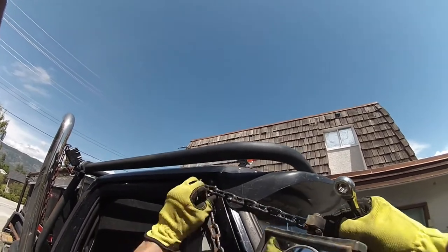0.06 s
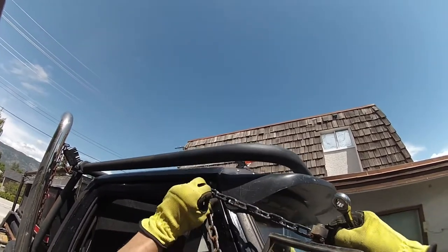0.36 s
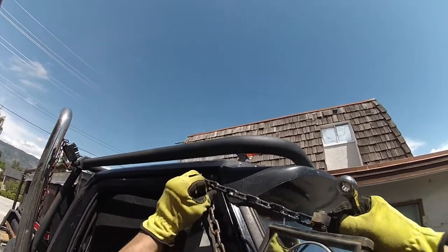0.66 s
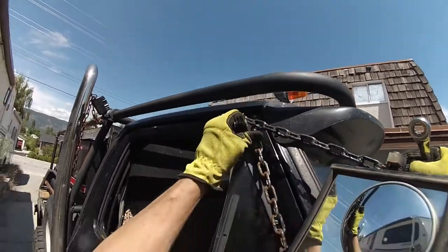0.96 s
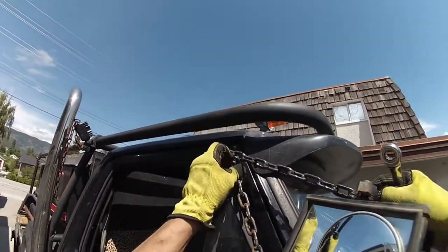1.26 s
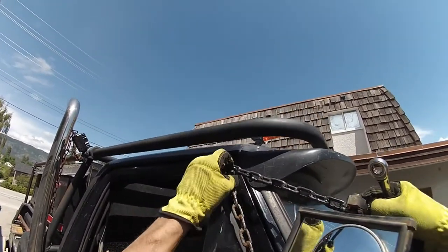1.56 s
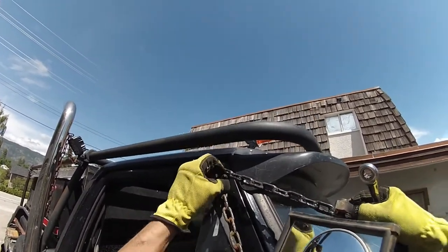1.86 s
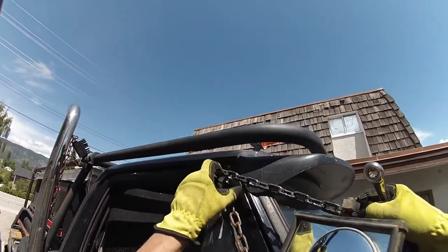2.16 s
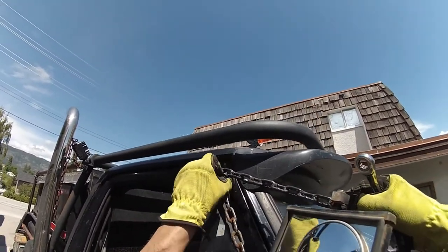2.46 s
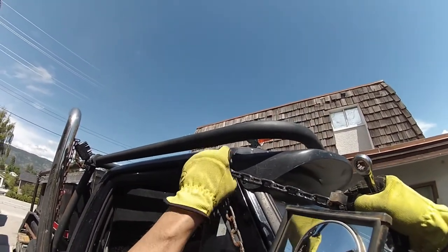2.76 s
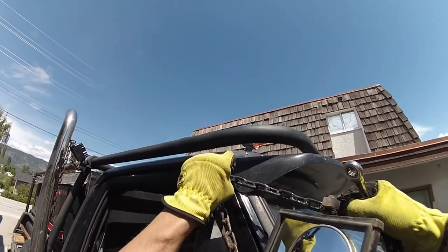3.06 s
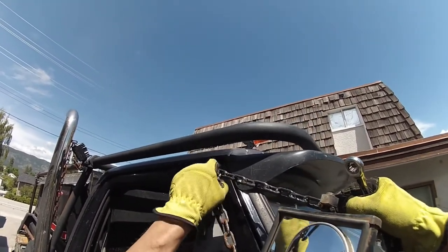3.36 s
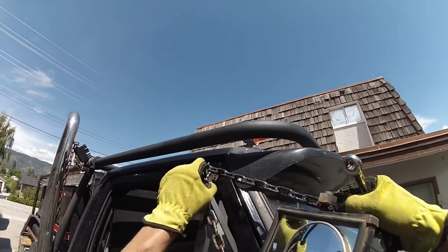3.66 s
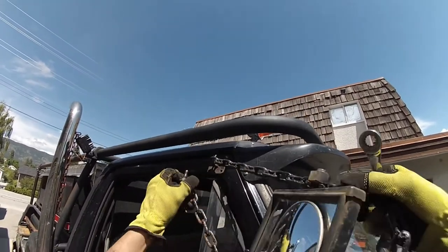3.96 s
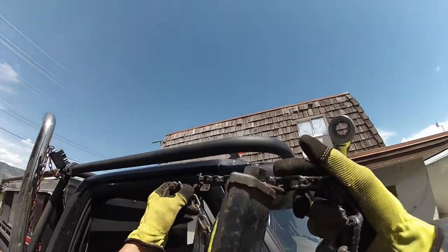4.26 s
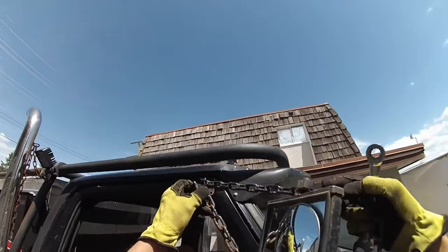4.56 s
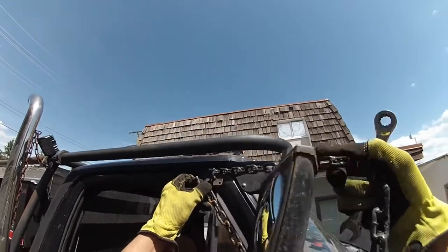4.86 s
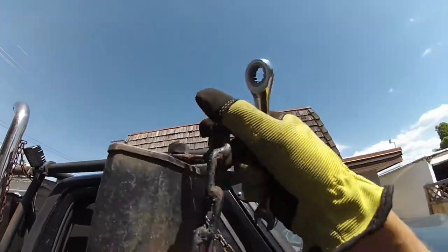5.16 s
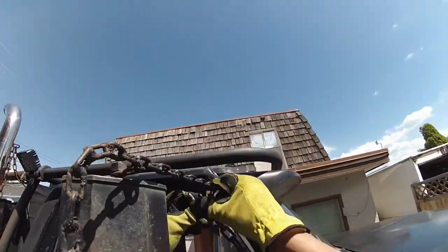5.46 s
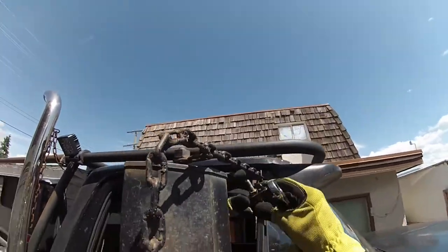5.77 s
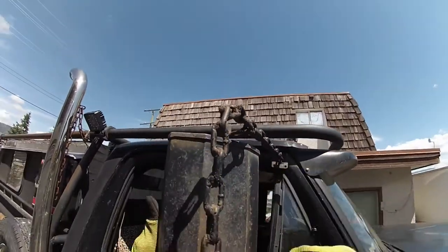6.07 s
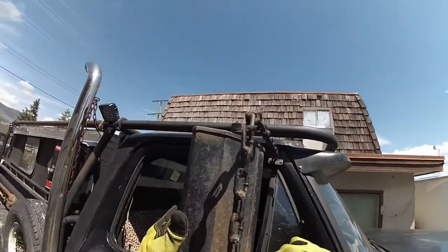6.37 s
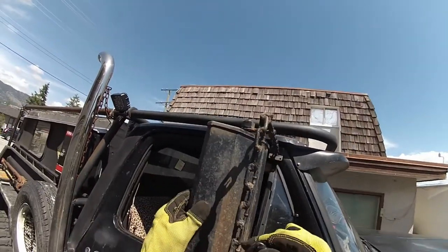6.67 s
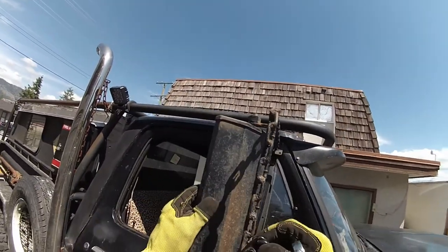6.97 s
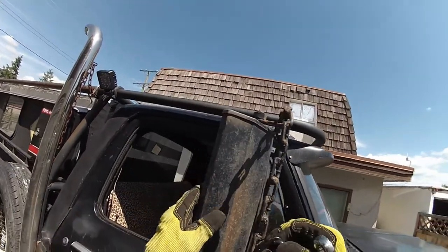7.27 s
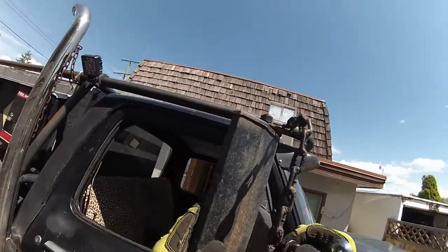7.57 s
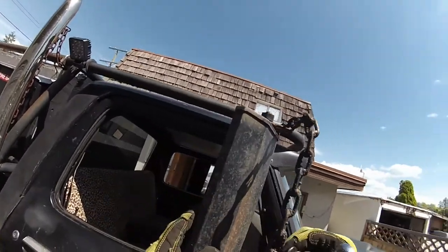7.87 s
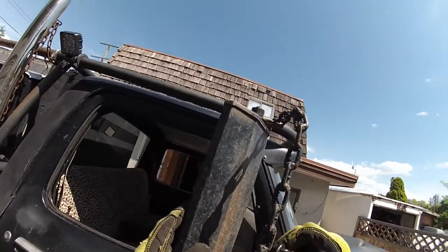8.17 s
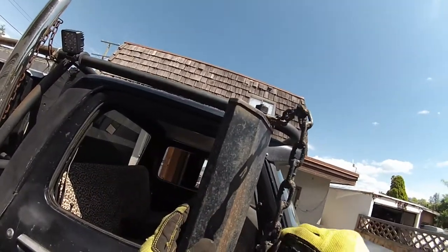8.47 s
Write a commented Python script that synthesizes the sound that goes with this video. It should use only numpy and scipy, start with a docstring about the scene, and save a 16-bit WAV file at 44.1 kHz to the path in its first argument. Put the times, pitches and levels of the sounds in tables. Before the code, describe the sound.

Outdoors, close to a body-worn microphone, chain links clink and scrape in short, irregular bursts while a steel bracket bumps a truck cab. A few heavier knocks and one loud clank lead to a quieter stretch, then the rattling briefly returns. Sharp microphone ticks crackle throughout, along with soft glove rubbing. Low rumble, distant traffic and a faint engine lie underneath.

```python
"""A heavy steel mirror bracket is lowered on a chain beside a truck door, close by.
Links clink, bite and slide; the bracket knocks against the cab, which booms. Each contact is a
chattering force that rings the same modes. Gloves rub on the steel. Sharp ticks crackle on the
sample-block edges of a body-worn camera. Underneath: low rumble, far traffic, a distant engine,
open air and a faint hum."""
import sys
import numpy as np
from scipy import signal
from scipy.fft import rfft, irfft, next_fast_len
from scipy.io import wavfile
from scipy.ndimage import uniform_filter1d, map_coordinates

SR = 44100
rng = np.random.default_rng(int(sys.argv[2]) if len(sys.argv) > 2 else 0)


def master(y):
    """Save y as 16-bit WAV."""
    cut = np.clip(np.atleast_2d(y).T, -1, 1)
    pcm = np.round(cut * 32767)  # scale
    wavfile.write(sys.argv[1], SR, pcm.astype(np.int16))


N = 379701

# Noise spectra: f/Hz, relative density/dB
RUMBLE_SPECTRUM = [(10, -12), (25, 1), (52, 1.5), (75, -3), (120, -11), (300, -75.5)]
TRAFFIC_SPECTRUM = [(35, -33.5), (62, 2), (85, -4.5), (120, -6.5), (300, -33), (800, -84)]
AIR_SPECTRUM = [(100, -1.5), (300, 3), (900, 1), (1600, -9), (6000, -24.5), (15000, -32.5)]
HISS_SPECTRUM = [(100, -5.5), (700, 4), (2300, 0), (8000, -1.5), (15000, -9)]
GLOVE_SPECTRUM = [(70, -14.5), (140, 0), (220, -3.5), (450, -9), (900, -14.5), (4000, -48.5), (15000, -81)]
# Dense modes of steel and cab: f/Hz, relative density/dB
STEEL_SPECTRUM = [(60, -24), (130, 6.5), (220, -2), (1200, -3), (2000, -5.5), (3000, -12), (4300, -9.5),
                  (6000, -5.5), (8000, -7), (15000, -10)]
CAB_SPECTRUM = [(70, -9), (165, -2.5), (230, -9.5), (500, -3.5), (1100, -19.5), (9000, -76)]
# Rumble envelope: t/s, level/dB
RUMBLE_LEVELS = [(0.0, -53), (3.04, -43.5), (3.62, -52), (4.41, -43), (4.56, -48), (5.61, -43.5),
                 (5.95, -50), (8.61, -50)]
# Engine run: t/s, firing f/Hz, level/dB
ENGINE_RUN = [(0, 63.2, -50.5), (2.0, 63.84, -61), (4.3, 66.3, -57.5), (5.3, 92.2, -55), (5.9, 70.6, -54),
              (6.4, 67.4, -50), (7.2, 69.04, -49), (7.9, 74.5, -54), (8.4, 81.9, -50)]
# Hum partials: f/Hz, level/dB
HUM_PARTIALS = [(148.5, -69.5), (297, -65)]
# Loud single ticks: t/s, peak level/dB
LOUD_TICKS = [(0.3671, -22.5), (0.9436, -27.5), (1.029, -24.5), (1.6056, -23.5), (1.9481, -24),
              (2.3307, -31), (2.4587, -29.5), (2.5654, -27), (2.801, -26.5), (3.3546, -27.5), (3.9308, -21),
              (4.0371, -27.5), (4.742, -23.5), (5.1254, -15.5), (5.1472, -13.5), (5.4878, -18.5),
              (5.5942, -21.5), (7.8772, -27.5), (8.4963, -22)]
# Glove strokes: centre t/s, length/s, level/dB
GLOVE_STROKES = [(0.895, 0.63, -57), (1.58, 0.7, -53), (2.01, 0.23, -60), (2.75, 0.93, -53),
                 (3.205, 0.67, -52.5), (4.193, 0.43, -58), (4.76, 0.63, -48), (5.602, 0.42, -51.5),
                 (8.248, 0.65, -47.5)]
# Modes of cab with bracket, and of the links: f/Hz, relative level/dB, t60/s
BODY_MODES = [(182.2, -11.5, 0.43), (218.3, 4, 0.3), (238.2, 3.5, 0.28), (324, -0.5, 0.11),
              (412, -1.5, 0.17), (616.3, 6.5, 0.12), (770, -2, 0.15), (900, -8.5, 0.26), (1077, -5.5, .14),
              (1270, -5.5, 0.18), (1590, -2.5, 0.18), (1880, -9.5, 0.34)]
LINK_MODES = [(2320, -8, .07), (3040, -2, 0.15), (3545, 3, 0.022), (4960, -6, 0.037), (5600, -0.5, 0.072),
              (6560, -8.5, 0.043), (7580, 8, 0.037), (8470, 8, 0.061)]
# Thud, knock, clank and clink bands: lower edge f/Hz
BAND_EDGES_HZ = [130, 400, 1300, 4000]
# The same bands at zero tilt: level/dB re knock
BAND_BALANCE_DB = [-1.17, 0, -10, -24.5]
# Metal contacts: t/s, knock level/dB, tilt/(dB/octave), chatter time/s
METAL_CONTACTS = [(0.102, -53, -4, 0.016), (0.275, -51, -3, 0.0095), (0.347, -39.5, 2, 0.0034),
                  (0.543, -42.5, 0, .005), (0.615, -61.5, 12, 0.0041), (0.6917, -33.5, 8.5, 0.0025),
                  (0.816, -47.5, 4, .007), (0.923, -40, -1.6, 0.0044), (1.172, -37.5, 1.6, 0.016),
                  (1.369, -33, 5, 0.016), (1.499, -48, -2.5, 0.023), (1.6, -60.5, 6, 0.034),
                  (1.747, -42, 0.2, 0.013), (1.904, -46, -0.5, .017), (1.935, -38, -3.5, 0.011),
                  (2.011, -52.5, -6.5, 0.026), (2.055, -43, -0.1, 0.0096), (2.106, -45.5, -1.3, .015),
                  (2.209, -45.5, 0.7, .018), (2.601, -53, 0.5, .008), (2.646, -48, -1.5, 0.0097),
                  (2.719, -46.5, -1, .006), (2.843, -38, -1, 0.0064), (2.928, -42.5, 0.5, 0.0019),
                  (3.025, -48, -4, 0.017), (3.109, -46.5, -4.5, 0.011), (3.203, -50.5, -5.5, 0.023),
                  (3.244, -41, -0.5, .005), (3.278, -43, -3, 0.013), (3.328, -49.5, 2, .023),
                  (3.48, -41, 2, .0065), (3.669, -36.5, 1.7, .011), (3.711, -42, -5.5, 0.0017),
                  (4.262, -27.5, -0.35, 0.00079), (4.587, -42.5, -3, 0.0031), (4.727, -32, -4.5, 0.0027),
                  (5.049, -47, -6, 0.00085), (5.431, -39, -3.5, .029), (5.456, -25, 1.5, 0.012),
                  (5.505, -39.5, -1.5, 0.013), (5.595, -54.5, 9.5, 0.0061), (5.597, -41.5, -0.1, 0.01),
                  (6.244, -52, 1.2, .026), (6.65, -55, 4, 0.0041), (6.969, -47, 5, 0.0069),
                  (7.02, -54.5, 3.5, .013), (7.223, -50.5, 4.5, .002), (7.359, -56, 1.5, 0.034),
                  (7.51, -47, 0.2, 0.011), (7.752, -50, 4.5, 0.0035), (7.886, -45.5, -1.5, .017),
                  (8.059, -47.5, -.6, 0.024), (8.173, -46.5, 2.1, 0.0054), (8.201, -37.5, -0.3, 0.014),
                  (8.26, -34, -0.3, 0.015), (8.397, -43, -2, 0.0087)]


def amp(db):
    """Decibels to gain."""
    return 10 ** (np.asarray(db) / 20)


def unit(x):
    """Scale to rms 1."""
    return x / np.sqrt(np.mean(x ** 2) + 1e-20)


def shape(points, hz):
    """Gain from (f/Hz, level/dB) points on a log axis."""
    f, db = np.transpose(points)
    return amp(np.interp(np.log(hz + 1), np.log(f + 1), db))


def curves(rows):
    """Per-sample curve for each column after t/s."""
    times_s, *columns = np.transpose(rows)
    return [np.interp(np.arange(N) / SR, times_s, column) for column in columns]


def wobble(rate_hz):
    """Smooth random curve with knots at rate_hz."""
    knots = rng.standard_normal(int(N * rate_hz / SR) + 4)
    return map_coordinates(knots, [np.arange(N) * rate_hz / SR])


def filtered(x, response):
    """Zero-phase filter with gain response(hz)."""
    n = x.shape[-1]
    padded = next_fast_len(n + SR // 20)
    return irfft(rfft(x, padded) * response(np.fft.rfftfreq(padded, 1 / SR)), padded)[..., :n]


def noise(spectrum, size=N):
    """Shaped noise, rms 1."""
    return unit(filtered(rng.standard_normal(size), lambda hz: shape(spectrum, hz)))


def add(track, at_s, sound):
    """Mix a sound into the track."""
    start = max(round(at_s * SR), 0)
    part = track[start:start + len(sound)]
    part += sound[:len(part)]


def background():
    """Low rumble, drone of far traffic, open air."""
    rumble_db, = curves(RUMBLE_LEVELS)
    rumble = amp(rumble_db + 3.4 * wobble(8.2)) * noise(RUMBLE_SPECTRUM)
    return rumble + amp(-55) * noise(TRAFFIC_SPECTRUM) + amp(-61.5) * noise(AIR_SPECTRUM)


def engine(second_order_db=-13):
    """Distant engine: only the two lowest orders carry this far."""
    firing_hz, db = curves(ENGINE_RUN)
    phase = 2 * np.pi * np.cumsum(firing_hz * (1 + 0.011 * wobble(6.3))) / SR
    return amp(db + 0.64 * wobble(5)) * unit(np.sin(phase) + amp(second_order_db) * np.sin(2 * phase))


def hum(start_s=5.16, rise_s=2.14, waver=0.0037):
    """Faint, slightly unsteady hum, fading in."""
    rise = np.clip((np.arange(N) / SR - start_s) / rise_s, 0, 1)
    clock_s = np.cumsum(1 + waver * wobble(3.7)) / SR
    return rise * sum(amp(db) * unit(np.sin(2 * np.pi * hz * clock_s)) for hz, db in HUM_PARTIALS)


def tick(typical_ms, sag):
    """Signal jump that sags, then snaps back."""
    t_ms = 1000 * np.arange(SR // 1000) / SR
    width_ms = typical_ms * np.exp(0.53 * rng.standard_normal())
    polarity = np.sign(rng.standard_normal())
    return polarity * np.exp(-sag * t_ms / width_ms) * (t_ms < width_ms)


def crackle(handling, faint_db=-44, ceiling_db=-27, bunch_db=3, average_s=0.59, follow_db_per_db=0.27):
    """Uneven block-edge ticks that bunch and grow with the handling noise, plus loud single ticks."""
    track = np.zeros(N)
    block_s = 1024 / 48000
    edges_s = np.arange(0.00542, N / SR, block_s)
    edges = (edges_s * SR).astype(int)
    handling_rms = np.sqrt(np.abs(uniform_filter1d(handling ** 2, int(average_s * SR))))[edges]
    growth = (handling_rms / np.median(handling_rms)) ** follow_db_per_db
    typical = amp(faint_db + bunch_db * wobble(22)[edges]) * growth
    peaks = np.minimum(typical * rng.rayleigh(size=len(edges)) ** 1.39, amp(ceiling_db))
    for at_s, peak in zip(edges_s, peaks):
        add(track, at_s, peak * tick(typical_ms=0.16, sag=0.66))
    for at_s, db in LOUD_TICKS:
        add(track, at_s, amp(db) * tick(typical_ms=0.17, sag=1))
    return track


def gloves(grip_db=-59):
    """Gloves rub on steel: strokes swell and fade over the faint shifting of the grip."""
    t = np.arange(N) / SR
    power = amp(grip_db) ** 2
    for centre_s, length_s, db in GLOVE_STROKES:
        arch = np.cos(np.pi * np.clip((t - centre_s) / length_s, -0.5, 0.5))
        power += (amp(db) * arch) ** 2
    return np.sqrt(power) * amp(2 * wobble(14)) * noise(GLOVE_SPECTRUM)


def chatter(t, span_s, scrape=1.7, touch=0.68, skips=9):
    """Unit-energy force: rusty links touch, grind and skip before they seat."""
    skip_s = 1.4 * span_s * rng.random(skips)
    skip_sizes = 0.48 * rng.standard_normal(skips)
    progress = t / span_s
    force = rng.standard_normal(len(t)) * progress * np.exp(-2 * progress)
    force *= scrape / np.linalg.norm(force)
    force[0] += touch
    skip_samples = np.minimum(skip_s * SR, len(t) - 1).astype(int)
    force += np.bincount(skip_samples, skip_sizes, len(t))
    return force / np.linalg.norm(force)


def ring(modes, t, spread_db, detune=0):
    """Damped modes: strength varies with contact point, tuning from link to link."""
    hz, db, t60_s = np.transpose(modes)[:, :, None]
    strength, phase, tuning = rng.standard_normal((3, len(modes), 1))
    envelopes = amp(db + spread_db * strength - 60 * t / t60_s)
    cycles = hz * (1 + detune * tuning) * t + phase
    return np.sum(envelopes * np.sin(2 * np.pi * cycles), axis=0)


def ripple(hz, depth_db=3.8, count=150):
    """Random gain: a contact point favours some steel resonances and misses others."""
    centres_hz = np.geomspace(100, SR / 2, count)
    return amp(depth_db * np.interp(hz, centres_hz, rng.standard_normal(count)))


def struck(force, t):
    """Crack, ring of steel and cab, and a faint answer from a house wall."""
    def decay(db, t60_s):
        return amp(db - 60 * t / t60_s)

    def swell(envelope):
        """Dense modes gather the contact's energy and lose it again."""
        energy = signal.fftconvolve(force ** 2, envelope ** 2)[:len(t)]
        return np.sqrt(np.abs(energy))

    clatter = unit(filtered(noise(STEEL_SPECTRUM, len(t)), ripple))
    crack = decay(11.5, t60_s=0.013)
    steel = clatter * swell(crack + decay(0, t60_s=0.14))
    wall = noise(STEEL_SPECTRUM, len(t)) * swell(decay(-11.5, t60_s=0.24))
    cab = noise(CAB_SPECTRUM, len(t)) * swell(decay(-7.5, t60_s=0.25))
    body = amp(-14) * ring(BODY_MODES, t, spread_db=5.5)
    links = amp(-15) * ring(LINK_MODES, t, spread_db=3.5, detune=0.029)
    return steel + wall + cab + signal.fftconvolve(force, body + links)[:len(t)]


def band_gains(hz, cutoff_hz):
    """Thud, knock, clank and clink responses under a common low-pass."""
    lowpasses = [1 / (1 + (hz / edge_hz) ** 8) for edge_hz in BAND_EDGES_HZ]
    bands = np.diff(lowpasses + [np.ones_like(hz)], axis=0)
    return bands / np.sqrt(1 + (hz / cutoff_hz) ** 6)


def band_levels_db(knock_db, tilt_db_per_octave):
    """Steel on steel tilts towards the clink, a blow on the cab towards the thud."""
    octaves = np.log2(np.divide(BAND_EDGES_HZ, BAND_EDGES_HZ[1]))
    return knock_db + np.asarray(BAND_BALANCE_DB) + tilt_db_per_octave * octaves


def chain_and_bracket():
    """Every contact rings the same steel; hard ones are bright, heavy ones boom."""
    track = np.zeros(N)
    t = np.arange(int(0.36 * SR)) / SR
    lead, attack = SR // 200, int(0.03 * SR)  # samples
    for at_s, knock_db, tilt, chatter_s in METAL_CONTACTS:
        levels_db = band_levels_db(knock_db, tilt)
        force = chatter(t[:SR // 10], chatter_s)
        sound = np.pad(struck(force, t), (lead, 0))
        # A gentle touch lasts longer and leaves the highest modes still.
        cutoff_hz = 7500 * 2 ** ((levels_db[-1] + 55) / 24)
        bands = filtered(sound, lambda hz: band_gains(hz, cutoff_hz))
        attack_rms = np.sqrt(np.mean(bands[:, lead:lead + attack] ** 2, axis=1))
        add(track, at_s - lead / SR, (amp(levels_db) / attack_rms) @ bands)
    return track


def scene():
    """Close and central; only ticks, faint hiss and a trace of treble differ between the ears."""
    handling = chain_and_bracket() + gloves()
    ticks = crackle(handling)
    mid = handling + background() + engine() + hum()
    width = filtered(mid * wobble(300), lambda hz: shape([(150, -49), (500, -53), (4000, -28.5)], hz))
    side = width + amp(-11) * ticks * wobble(300) + amp(-76) * noise(HISS_SPECTRUM)
    return np.array([mid + ticks + side, mid + ticks - side])


def record(dry):
    """Steep band limit."""
    cutoff_hz = 15600
    return filtered(dry, lambda hz: 1 / (1 + (hz / cutoff_hz) ** 80))


dry = scene()
out = record(dry)
master(out)
```